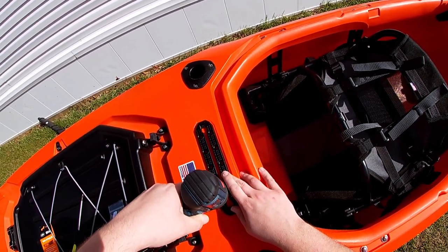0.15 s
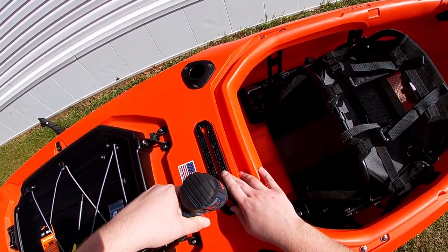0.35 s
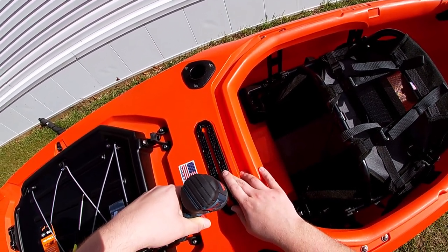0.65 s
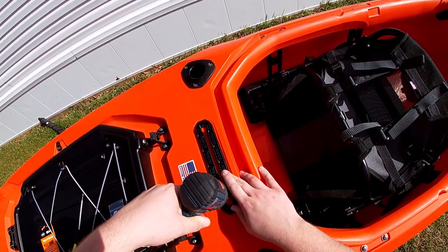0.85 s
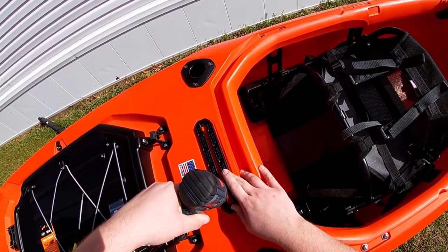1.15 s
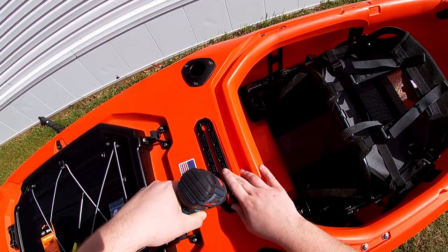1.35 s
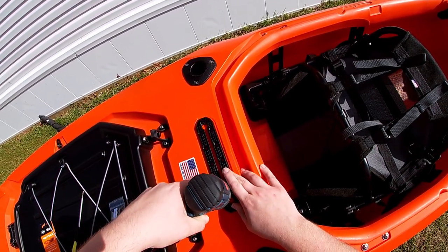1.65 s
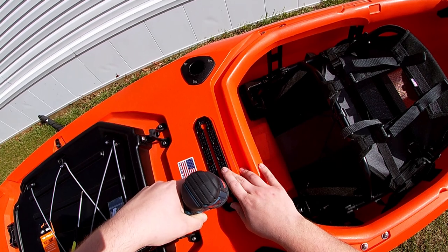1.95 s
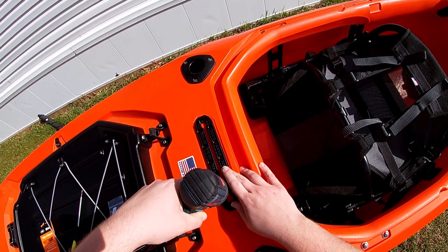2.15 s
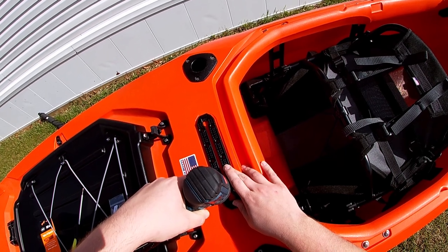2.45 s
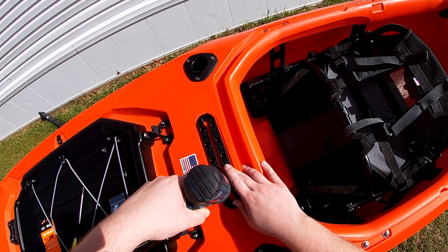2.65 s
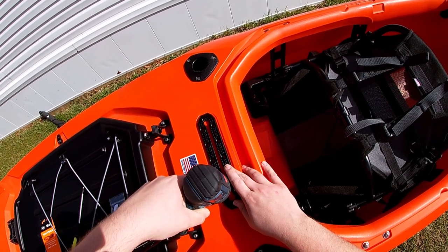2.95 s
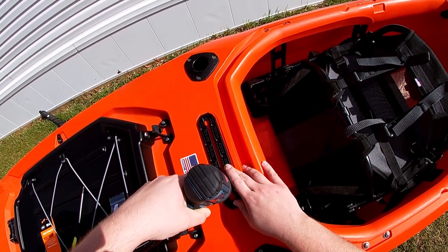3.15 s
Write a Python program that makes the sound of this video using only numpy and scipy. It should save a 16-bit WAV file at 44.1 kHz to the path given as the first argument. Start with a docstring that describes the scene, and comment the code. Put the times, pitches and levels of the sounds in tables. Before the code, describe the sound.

A cordless drill, close and dry outdoors, brakes from a high whine by 0.2 s with sharp clicks. Scattered plastic ticks follow; trigger clicks at 0.7 s lead into a bright whirring burst until 1.2 s. Gusts rumble and slap, strongest near 1.5 s. From 1.9 s it runs again, low and gritty, stepping up at 2.4 and 2.7 s to a loud, fast, pulsing whir that continues to the end.

```python
"""Outdoors, beside a plastic hull: a cordless drill held against it, one microphone, a far murmur behind.
The drill brakes to a stop, gives a short burst, then a longer run that speeds up in steps as the trigger
is squeezed: pulsing gear noise, a knock per chuck turn and lines at multiples of the motor speed.
Trigger and gear backlash click as short scrapes that ring the plastic shell.
Gusts buffet the microphone: low rumble, faster flutter and a few slaps, all of shaped noise."""
import sys
import numpy as np
from scipy import signal
from scipy.fft import rfft, irfft, next_fast_len
from scipy.io import wavfile
from scipy.ndimage import uniform_filter1d, map_coordinates

SR = 44100
rng = np.random.default_rng(int(sys.argv[2]) if len(sys.argv) > 2 else 0)


def rack_gain(trim_db):
    """Turn a fader trim in dB into the linear factor to multiply a signal by."""
    fader = np.asarray(trim_db, float)
    return 10 ** (fader / 20)


def log_audio(samples):
    """Write samples as a 16-bit WAV file to the path given in sys.argv[1]."""
    # one column per channel
    frames = np.atleast_2d(samples).T
    # limit to full scale, then quantise
    limited = np.clip(frames, -1, 1)
    pcm = np.round(limited * 32767).astype(np.int16)
    wavfile.write(sys.argv[1], SR, pcm)


N = 145530  # samples, 3.3 s


def unit(x):
    """Scaled to rms 1."""
    return x / np.sqrt(np.mean(x ** 2) + 1e-20)


def wobble(rate):
    """A smooth random curve, rate knots a second."""
    knots = rng.standard_normal(int(N * rate / SR) + 4)
    return map_coordinates(knots, [np.arange(N) * rate / SR])


def curves(rows):
    """One value per sample for each column after the time."""
    s, *columns = np.transpose(rows)
    return [np.interp(np.arange(N) / SR, s, column) for column in columns]


def coloured(x, points, peaks=()):
    """x through (Hz, dB) points on a log axis, plus bell-shaped resonances (Hz, width Hz, dB)."""
    size = next_fast_len(len(x) + 8192)
    hz = np.fft.rfftfreq(size, 1 / SR)
    point_hz, point_db = np.transpose(points)
    db = np.interp(np.log(hz + 1), np.log(point_hz + 1), point_db)
    for centre, width, gain_db in peaks:
        db = db + gain_db / (1 + (2 * (hz - centre) / width) ** 2)
    return irfft(rfft(x, size) * rack_gain(db), size)[:len(x)]


# far murmur and hiss, shape of the spectrum: freq_hz, relative_db (per Hz)
FAR_COLOUR = [(200, -24), (340, -15), (800, -6), (1280, -9.5), (1900, -21.5), (2800, -33), (8000, -34),
              (9500, -44), (15000, -57.5)]


def far():
    """The steady outdoor murmur and the microphone's hiss: one noise, wavering slowly in level."""
    level_db = -59.5 + 1.5 * wobble(5.13)
    return rack_gain(level_db) * unit(coloured(rng.standard_normal(N), FAR_COLOUR))


# gusts at the microphone: time_s, strength_db (of the rumble)
GUSTS = [(0, -28), (.06, -32.5), (.15, -25.5), (.22, -35.5), (.3, -33.5), (.36, -37.5), (.47, -30.5),
         (.58, -31), (.7, -39), (.77, -30.5), (.88, -35), (1, -30.5), (1.1, -22), (1.24, -26), (1.3, -27.5),
         (1.36, -42), (1.42, -41.5), (1.49, -16), (1.58, -24), (1.72, -30), (1.78, -35), (1.87, -26),
         (1.96, -34), (2.03, -42), (2.17, -38.5), (2.3, -25), (2.36, -24), (2.45, -34), (2.53, -26),
         (2.62, -51.5), (2.75, -41), (2.81, -22), (2.87, -42.5), (3.1, -56.5), (3.3, -42.5)]
# eddies of hard gusts hitting the microphone port: start_s, level_db
SLAPS = [(.125, -36), (1.486, -26.5), (1.57, -33), (1.652, -36)]
# shapes of the three wind noises: freq_hz, relative_db (per Hz)
SLAP_COLOUR = [(30, -28), (90, 3.5), (250, -5), (500, -11), (650, -19.5), (900, -26), (1500, -120)]
RUMBLE_COLOUR = [(8, -24), (15, -5), (43, 0), (120, -8.5), (220, -30), (400, -66), (800, -120)]
FLUTTER_COLOUR = [(60, -10.5), (170, 2.5), (280, -13), (550, -27.5), (900, -57), (1600, -120)]


def wind():
    """Lumpy low rumble on the microphone port; a faster flutter grows in the strong gusts; eddies slap."""
    calm_db, flutter_db = -31.5, -14  # gust strength called calm; flutter over the rumble at that strength
    flutter_grows = 0.28  # extra dB of flutter per dB of strength over calm
    slap_rise_s, slap_t60_s = 0.0047, 0.15
    strength_db, = curves(GUSTS)
    t = np.arange(N) / SR
    slap_shape = 0
    for s, db in SLAPS:
        rise = np.clip((t - s) / slap_rise_s, 0, 1) ** 2  # silent before s
        slap_shape = slap_shape + rack_gain(db - 60 * np.abs(t - s) / slap_t60_s) * rise
    slap = slap_shape * unit(coloured(rng.standard_normal(N), SLAP_COLOUR))
    lumps = rng.standard_normal(N) * rack_gain(2.5 * wobble(30.02))
    rumble = unit(coloured(lumps, RUMBLE_COLOUR))
    fast_lumps = rng.standard_normal(N) * rack_gain(5.5 * wobble(45))
    flutter = unit(coloured(fast_lumps, FLUTTER_COLOUR))
    flutter_gain = rack_gain(flutter_db + flutter_grows * (strength_db - calm_db))
    return rack_gain(strength_db) * (rumble + flutter_gain * flutter) + slap


# trigger and gear clicks: start_s, level_db (roughly the peak), colour_hz, scrape_ms
CLICKS = [(0.1203, -25.5, 1510, 1.8), (0.122, -17.5, 9200, 4.1), (0.131, -24, 3100, 3),
          (0.164, -37.5, 2600, 5), (0.1779, -34, 3020, 1.9), (0.2886, -40.5, 3000, 1.5),
          (0.3261, -44, 6100, 3.7), (0.33, -30.5, 2900, 6.3), (0.4035, -25, 2500, 2.4),
          (0.6133, -43, 8000, 2.6), (0.6303, -34, 5970, 5.3), (0.7015, -36, 5300, 6.9),
          (0.7265, -37, 2900, 2.8), (0.7289, -28.5, 6440, 3.1), (0.7541, -31, 2530, 3.6),
          (0.76, -24, 4520, 2), (0.7731, -23.5, 9300, 4.8), (0.7828, -25, 1560, 6.3),
          (1.268, -37.5, 6000, 5.9), (1.2863, -39, 6500, 6.5), (1.3083, -31.5, 3240, 5.3),
          (1.3161, -30, 3270, 8), (1.732, -39.5, 6700, 5), (1.8758, -43, 2540, 2.7),
          (1.9029, -33, 3040, 4.4)]
# ringing modes of the plastic shell: pitch_hz, relative_db, t60_s
SHELL = [(1200, -15, 0.02), (2080, -11, 0.0075), (2570, -0.5, 0.021), (3100, -0.5, 0.012)]
# shape of the scrape noise: freq_hz, relative_db
SCRAPE_COLOUR = [(500, -24), (1000, 6.5), (3000, -4.5), (7500, -5), (10500, -19), (15000, -38)]


def clicks():
    """Each contact scrapes a few ms in its own colour and rings the shell, the duller ones more; a faint tail."""
    colour_width, colour_db = 0.35, 7  # bell width as a share of colour_hz, and its height
    ring_db, ring_loss_db = 2, 7  # the loss is per octave between mode and colour
    tail_db, tail_t60_s = -20, 0.12
    out, t = np.zeros(N + 4096), np.arange(4096) / SR
    for s, db, hz, ms in CLICKS:
        u = t * 1000 / ms  # time in scrape lengths
        bell = [(hz, colour_width * hz, colour_db)]
        noise = unit(coloured(rng.standard_normal(len(t)), SCRAPE_COLOUR, bell))
        decay = np.exp(-u ** 3) + rack_gain(tail_db - 60 * t / tail_t60_s)
        scrape = noise * decay * (1 - np.exp(-u / 0.12))
        ring = 0
        for f, mode_db, t60 in SHELL:
            start_db = mode_db + rng.normal(0, 1.1) - ring_loss_db * abs(np.log2(f / hz))
            ring = ring + rack_gain(start_db - 60 * t / t60) * np.sin(2 * np.pi * f * t)
        # noise peaks stand well above its rms, hence the 11.5 dB
        out[round(s * SR):][:len(t)] += rack_gain(db - 11.5) * (scrape + rack_gain(ring_db) * ring)
    return out[:N]


# motor speed: time_s, speed_rev_per_s
SPEED = [(0, 168), (.115, 140), (.15, 60), (.7, 10), (.79, 115), (.82, 148), (.86, 165), (.9, 174),
         (.96, 179), (1.16, 178.9), (1.19, 172), (1.26, 30), (1.89, 10), (1.93, 60), (1.98, 119),
         (2.02, 127), (2.08, 132), (2.2, 132.5), (2.33, 136.5), (2.38, 162), (2.43, 186), (2.5, 199.5),
         (2.61, 199), (2.64, 224), (2.75, 312), (2.82, 322), (2.92, 328.5), (3.3, 328.5)]
# how the casing passes the lines: freq_hz, gain_db
LINE_PASS = [(330, 0), (440, 5), (600, -2), (880, 6.5), (1350, 3), (1520, 8.5), (1750, 2), (2200, 1),
             (3300, -4), (4000, -28), (4700, 1), (4950, 1), (5300, -30)]
# casing resonances on the gear noise: centre_hz, width_hz, gain_db
CASING = [(1040, 940, 4.5), (2190, 210, 3.5), (3100, 410, 4.5), (4804, 460, 3.5), (5930, 2160, 5),
          (9520, 1200, 4), (12400, 760, 5)]
# shape of the knock when the bit bites: freq_hz, relative_db (per Hz)
KNOCK_COLOUR = [(700, -14), (1000, -7), (1500, -21), (2100, 10), (2600, -27), (3150, 3.5), (3700, -8),
                (6000, -10), (9000, -60)]


def motor(rows, orders, dull, bright, bite_s):
    """One run: gear noise pulsing per motor turn, a bite per chuck turn (one at bite_s), unsteady speed lines."""
    motor_per_chuck = 19.15  # motor turns per chuck turn
    rev_pulse, bite_sag = 0.14, 0.004  # swell per motor turn; share of speed lost at each bite
    knock_db, knock_sharp = -0.5, 2.5
    line_waver_db, line_drift, line_swell_db = 1.3, 0.12, 0.4  # the swell comes with each bite
    smear_db = 1.6  # lines lose this much per 1000 rev/s2 of speed change
    (speed,), (level_db, share) = curves(SPEED), curves(rows)
    turns, t = np.cumsum(speed) / SR, np.arange(N) / SR
    pulse = 1 + rev_pulse * np.cos(2 * np.pi * turns)
    chuck = 2 * np.pi * (turns - np.interp(bite_s, t, turns)) / motor_per_chuck
    shaft = 2 * np.pi * turns - bite_sag * motor_per_chuck * np.sin(chuck)
    bite = np.exp(knock_sharp * (np.cos(chuck) - 1)) * rack_gain(0.69 * wobble(13))

    source = rng.standard_normal((3, N)) * pulse
    source = source * rack_gain(0.9 * wobble(120) + 0.75 * wobble(25.02))  # random rattle
    dull_noise = unit(coloured(source[0], dull, CASING))
    bright_noise = unit(coloured(source[1], bright, CASING))
    noise = np.sqrt(1 - share) * dull_noise + np.sqrt(share) * bright_noise
    knock = rack_gain(knock_db) * speed / speed.max() * bite * unit(coloured(source[2], KNOCK_COLOUR))

    lines = 0
    for multiple, db in orders:
        strength = rack_gain(db + line_waver_db * wobble(24.97))
        drift = line_drift * multiple ** 0.5 * wobble(11)  # radians
        lines = lines + strength * np.sin(multiple * shaft + drift)
    speed_change = uniform_filter1d(np.abs(np.gradient(speed)), size=900) * SR  # rev/s2
    steady = rack_gain(-smear_db * speed_change / 1000)
    lines = steady * rack_gain(line_swell_db * bite) * coloured(lines, LINE_PASS)
    running = (t >= rows[0][0]) * (t <= rows[-1][0] + 0.01)
    return rack_gain(level_db) * (noise + knock + lines) * running


# the braking run, then the short burst, each: time_s, level_db, bright_share (0-1)
BURSTS = [
    [(0, -41.5, 0.98), (.115, -41.5, 0.68), (.14, -44.5, 0.44), (.17, -60.5, 0), (.22, -66.5, 0)],
    [(.7, -59.5, 0), (.75, -50.5, 0.07), (.79, -43.5, 0.1), (.82, -43, 0.83), (.89, -39, 0.99),
     (1.16, -39.5, 0.93), (1.19, -39, 0.8), (1.21, -45, 0.1), (1.25, -63.5, 0.1), (1.3, -61.5, 0)],
]
# the long run: time_s, level_db, bright_share (0-1)
DRILLING = [(1.9, -60, 0), (1.935, -49.5, 0), (1.97, -50, 0.1), (2.08, -45.5, 0.02), (2.2, -45.5, 0),
            (2.33, -46.5, 0), (2.38, -42.5, 0), (2.6, -43, 0.12), (2.65, -39, 0.04), (2.78, -37, 0.25),
            (2.92, -37.5, 0.35), (3.05, -36, 0.46), (3.3, -33.5, 0.98)]
# lines of each kind of run: multiple (of motor speed), relative_db (to the run, before the casing)
BURST_ORDERS = [(4, -16), (6.63, -12), (26.45, -7.5), (27.45, -11), (28.45, -12)]
DRILLING_ORDERS = [(1, -17), (1.34, -26), (2, -18), (3, -21), (3.42, -18), (3.82, -22), (5, -21.5),
                   (6, -19), (6.65, -10), (6.92, -16), (9.11, -14), (10, -12), (14.34, -17), (16.6, -10.5),
                   (20, -9)]
# gear and brush noise through the housing, dull and bright: freq_hz, relative_db (per Hz)
BURST_DULL = [(200, 1), (420, 3.5), (1600, 3.5), (3800, -2.5), (8000, -10), (15000, -44)]
BURST_BRIGHT = [(250, -9), (600, -13.5), (2800, -8.5), (3750, -15.5), (4550, -8.5), (4800, -6.5),
                (5100, -10.5), (8000, -12.5), (11000, -30), (15000, -39)]
DRILLING_DULL = [(250, -7.5), (600, -14.5), (1300, -5.5), (2900, -6), (3800, -15.5), (6300, -11.5),
                 (7300, -26.5), (11500, -30), (15000, -42)]
DRILLING_BRIGHT = [(120, -2), (300, -13.5), (900, -12.5), (2200, -6.5), (3800, -9.5), (7800, -9),
                   (9000, -17), (15000, -31.5)]


def drill():
    """The three runs of one motor in turn; the braking motor keeps only its high whine."""
    braking_rows, burst_rows = BURSTS
    braking = motor(braking_rows, BURST_ORDERS[2:], BURST_DULL, BURST_BRIGHT, bite_s=1.03)
    burst = motor(burst_rows, BURST_ORDERS, BURST_DULL, BURST_BRIGHT, bite_s=1.03)
    drilling = motor(DRILLING, DRILLING_ORDERS, DRILLING_DULL, DRILLING_BRIGHT, bite_s=3.055)
    return braking + burst + drilling


def scene():
    """All sources at one microphone."""
    return (drill() + clicks() + wind() + far())[None]


def low_pass(x):
    """Removes everything above the highest recorded frequency."""
    return signal.sosfilt(signal.butter(12, 15500, fs=SR, output="sos"), x)


def record(dry):
    """The microphone signal, band-limited steeply above 15.1 kHz."""
    top_hz = 15100
    mix = coloured(dry[0], [(top_hz, 0), (top_hz + 200, -80)])[None]
    return low_pass(mix)


dry = scene()
out = record(dry)
log_audio(out)
```